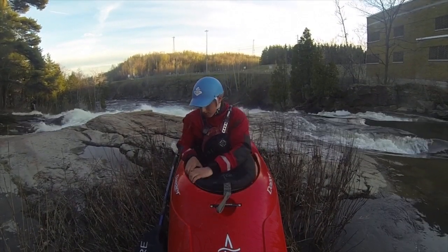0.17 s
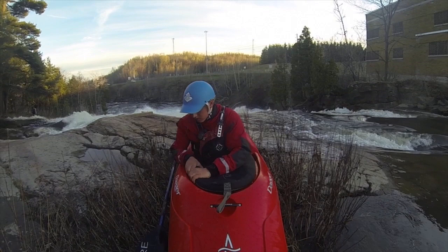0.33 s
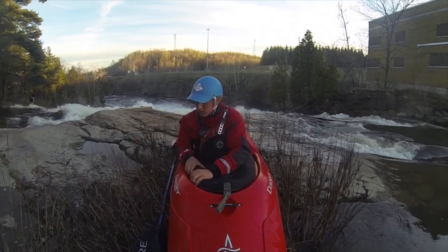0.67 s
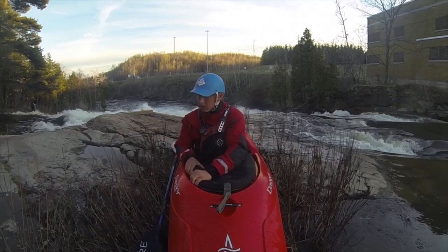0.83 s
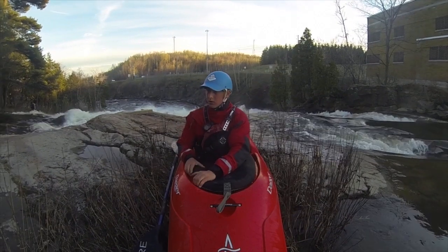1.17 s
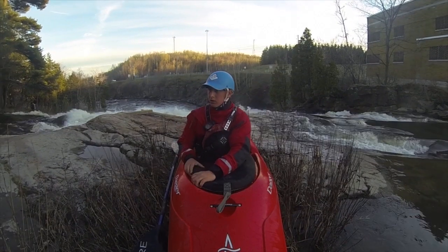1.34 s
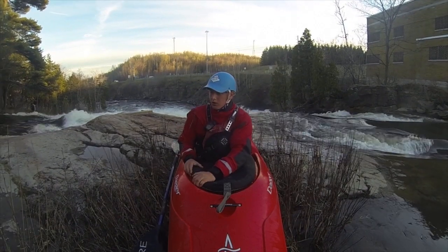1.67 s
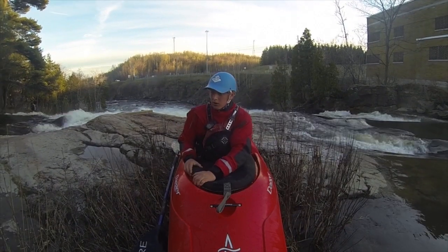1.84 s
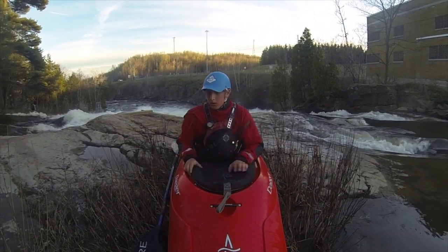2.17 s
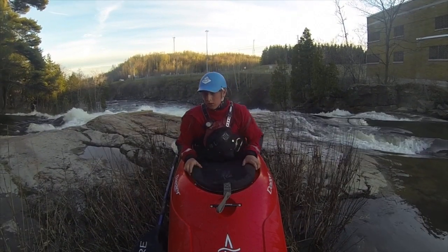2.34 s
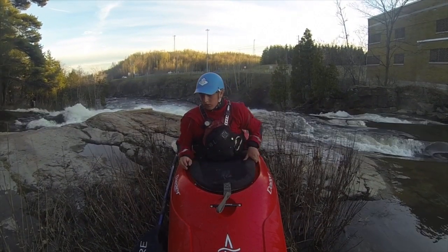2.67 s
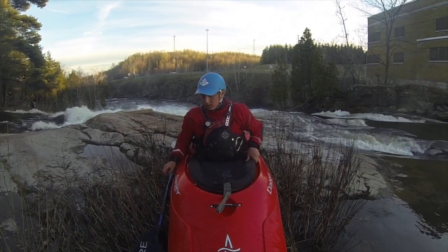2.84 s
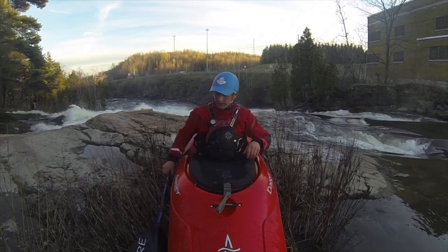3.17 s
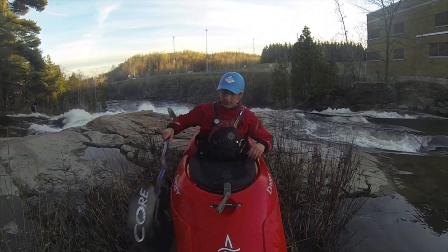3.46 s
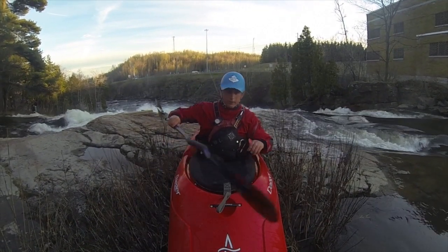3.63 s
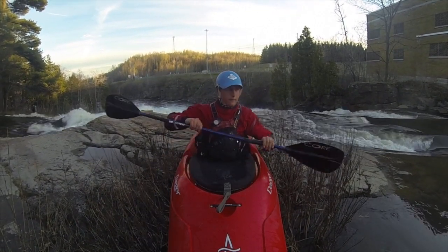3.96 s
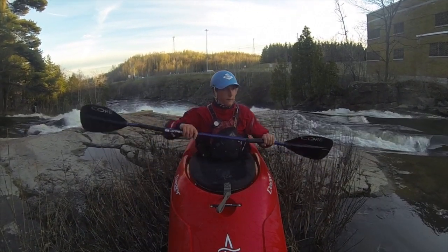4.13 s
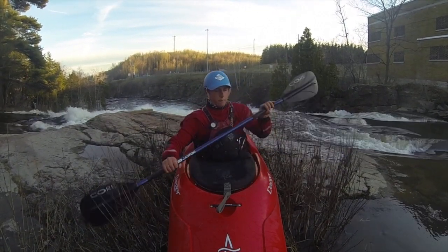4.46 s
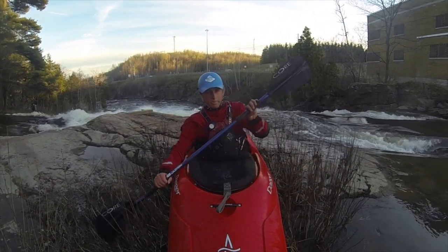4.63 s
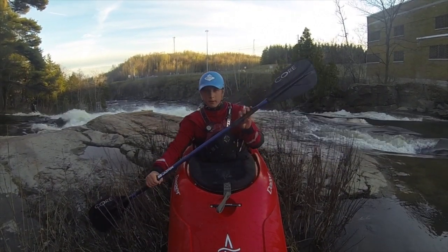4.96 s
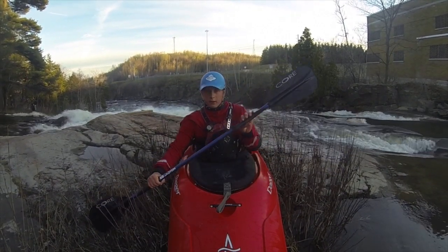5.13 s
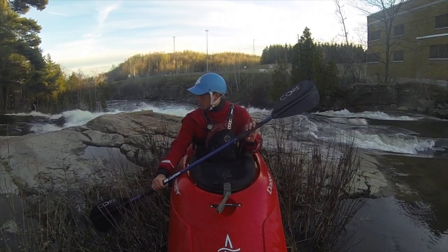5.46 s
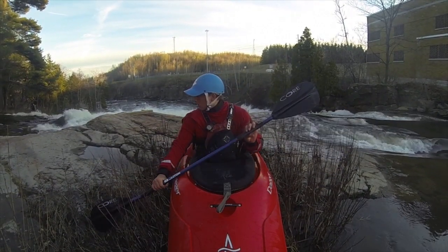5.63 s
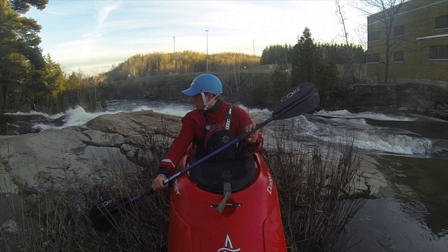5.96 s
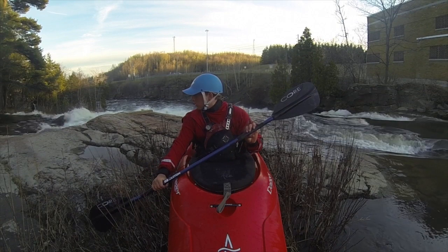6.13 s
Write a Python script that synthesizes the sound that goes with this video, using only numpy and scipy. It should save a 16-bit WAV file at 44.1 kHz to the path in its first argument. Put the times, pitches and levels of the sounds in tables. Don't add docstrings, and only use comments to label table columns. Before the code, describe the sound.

Boomy, close hull bumps and paddle clacks on a plastic boat, with dull white-water roar and a faint electronic whine behind.

```python
import sys
import numpy as np
from scipy import signal
from scipy.fft import rfft, irfft
from scipy.io import wavfile
from scipy.ndimage import uniform_filter1d

SR = 44100
rng = np.random.default_rng(int(sys.argv[2]) if len(sys.argv) > 2 else 0)


def dump(signal):
    limited = np.clip(np.atleast_2d(signal).T, -1, 1)
    pcm = np.round(limited * 32767).astype(np.int16)
    wavfile.write(sys.argv[1], SR, pcm)


def invert_db(x):
    u = np.asarray(x, float) / 20
    return 10 ** u


N = 277830

# frequency in Hz, level in dB per Hz.
SHELL_COLOUR = [(40, -29), (170, -10), (330, -22.5), (450, -37.5), (1100, -38), (1900, -34.5),
                (2400, -45.5), (3500, -51.5), (4600, -53.5), (5900, -57.5), (7000, -57.5), (8200, -64.5),
                (11500, -69.5), (16000, -81.5)]
# centre in Hz, width in Hz, level in dB per Hz.
SHELL_RESONANCES = [(254.2, 36, -7.5), (611, 120, -28), (696.5, 58, -25), (847, 28, -28.5), (951, 160, -34),
                    (1363, 180, -24), (1460.5, 195, -21.5), (1740, 120, -34), (2703, 87, -40),
                    (2948, 530, -39), (3484, 190, -47), (4130, 110, -53), (4990, 420, -50)]
# time in seconds,
# peak in dB.
TWIG_SNAPS = [(0.0012, -31), (.41, -61.5), (.49, -51.5), (1.0121, -49.5), (2.9292, -40.5), (3.032, -49),
              (3.9888, -55), (4.4194, -55), (4.62, -58), (4.642, -40.5), (4.667, -51), (4.6915, -51),
              (4.727, -47)]
# time in seconds, level in dB, T60 in seconds.
MOUNT_JOLTS = [
    (.1, -30, 1.5),
    (.28, -31, .7),
    (.52, -15, 2.6),
    (1.42, -26.5, 2.2),
    (2.0, -31, 2.7),
    (2.88, -38.5, 2.5),
    (4.28, -43, 1.0),
    (4.77, -36, 3.0),
    (5.72, -39, 3.0),
]
# start in seconds, length in seconds, level in dB.
SEAT_SHUFFLES = [(0.026, 0.33, -32.5), (0.31, 0.27, -24.5), (.55, 0.49, -32.5), (1.0, .06, -23),
                 (1.349, 0.13, -32), (1.92, 0.17, -33.5), (2.319, .15, -23.5), (2.456, 0.25, -27),
                 (2.65, 0.84, -37), (3.186, 0.23, -34.5), (4.1, 0.17, -33), (4.42, .16, -38),
                 (4.68, .3, -32), (5.538, 0.18, -39)]
# start in seconds, length in seconds, level in dB, pitch in Hz.
WEIGHT_SHIFTS = [(-.03, 0.052, -16, 131.6), (0.037, 0.19, -23, 116.7), (0.103, 0.26, -24, 118.7),
                 (0.397, 0.095, -20, 113.6), (0.469, 0.12, -12, 121), (0.632, 0.078, -23, 124.6),
                 (0.696, 0.14, -27, 129.3), (0.878, 0.12, -22.5, 118.8), (1.104, 0.19, -18.5, 121.7),
                 (1.369, 0.39, -30.5, 119.5), (1.699, .35, -28, 120.5), (2.089, 0.12, -26.5, 120),
                 (2.254, 0.063, -27.5, 119.4), (2.343, 0.29, -22, 118.6), (2.587, 0.093, -25.5, 118.6),
                 (2.908, .16, -20.5, 122.1), (3.053, 0.15, -25, 125.5), (3.219, 0.053, -10.5, 119.2),
                 (3.343, 0.11, -23, 116.1), (3.454, .33, -32, 118.4), (3.797, 0.29, -30.5, 120),
                 (4.114, 0.15, -24, 116), (4.262, .28, -31.5, 127.3), (4.529, 0.18, -25, 127.8),
                 (4.684, 0.13, -25, 124), (4.797, 0.19, -28, 118.1), (4.936, 0.13, -23.5, 121.6),
                 (5.257, 0.14, -26, 124), (5.466, 0.21, -33, 115.2), (5.994, 0.27, -32.5, 120.3)]
# start in seconds, length in seconds, level in dB, brightness in dB.
DECK_STROKES = [(0.166, 0.45, -36, -7.5), (0.396, 0.048, -24, -14), (.466, 0.041, -29.5, -3.5),
                (0.498, 0.045, -28.5, -15), (0.522, 0.17, -39, -8.5), (0.783, 0.089, -34, -12),
                (.89, .11, -41, -13), (2.19, 0.13, -45, -6), (2.303, 0.031, -30.5, -10.5),
                (2.329, .4, -46.5, -7.5), (2.931, 0.057, -29, -10), (3.021, 0.065, -34.5, -14),
                (3.121, 0.14, -32.5, -17), (3.254, 0.028, -30.5, -15), (3.284, 0.12, -46.5, -12),
                (4.148, 0.023, -30.5, -8), (4.16, 0.41, -42.5, -2.5), (4.524, .04, -31.5, -12),
                (4.56, 0.055, -41, -2), (4.594, 0.19, -29, -9), (4.83, 0.026, -34.5, -25),
                (4.874, 0.15, -40.5, -12)]
# time in seconds,
# peak in dB, depth in dB, hardness in dB.
HULL_KNOCKS = [(.403, -16.5, -10.5, -18.5), (.424, -20.5, -5, -15.5), (.469, -17, -18.5, -10),
               (.484, -10, -12, -15), (0.492, -11, -17.5, -12), (.788, -23.5, -21, -23),
               (.804, -20, -17, -16.5), (.897, -22.5, -18, -22), (.911, -23.5, -20, -13),
               (1.0128, -23.5, 8.5, -10), (1.019, -16.5, 0, -18), (1.0281, -11, -4, -16),
               (1.078, -28, -14, -16), (1.142, -32.5, 5.5, -29), (2.312, -35, 10.5, -15),
               (2.353, -28, -7, -23), (2.386, -35.5, 11, -21), (2.47, -38.5, 7.5, -16),
               (2.9312, -14, 1.5, -1.5), (2.9345, -11.5, 7, -9), (2.95, -13, -5, -33),
                 (3.032, -19, -5, -4.5), (3.037, -17, 7, -13), (3.059, -19, -12, -27),
                 (3.126, -23, -6, -30), (3.1674, -23.5, 4, -16), (3.18, -19, 0, -23), (3.191, -36, -9, -19),
                 (3.214, -19.5, 3.5, -13), (3.2712, -13, -9, -27), (4.151, -28, -1, -18),
                 (4.365, -35, -30, -23), (4.433, -29, 4.5, -13), (4.533, -28, -10, -16),
                 (4.63, -16, -18, -15), (4.728, -32, -7, -3), (4.838, -28, -14, -7), (4.899, -28, -16, -23),
                 (5.569, -20.5, 0, -3.5), (5.574, -25, 5.5, -6)]
# lower edge in Hz, upper edge in Hz.
KNOCK_BANDS = [
    (1150, 2200),
    (330, 1150),
    (2200, 3900),
    (3900, 6100),
]
# time in seconds, peak in dB, pitch in Hz, swell in seconds, T60 in seconds.
HULL_THUMPS = [(.062, 1.5, 111.7, 0.021, 0.097), (0.511, -3.5, 126.6, 0.014, 0.063),
               (.72, -12.5, 137.3, 0.022, 0.083), (1.012, -2.5, 254, 0.0018, 0.18),
               (1.016, 1, 130, 0.0042, 0.26), (1.014, -19.5, 704, 0.0061, 0.084),
               (1.035, -7, 123.4, 0.0094, 0.34), (1.1496, -2.5, 122.3, 0.004, 0.096),
               (2.944, -12, 129.2, 0.0099, 0.29), (3.217, -10, 122.5, 0.016, 0.26),
               (5.15, -24, 113.8, 0.036, 0.18), (5.566, -3.5, 87, 0.0056, 0.024),
               (5.571, -1, 120.7, 0.016, 0.055), (5.589, -8, 188, 0.0081, 0.023),
               (5.631, -17.5, 119.9, 0.016, 0.16)]
# time in seconds, depth in dB, recovery in seconds.
LIMITER_DUCKS = [
    (.075, -1.5, .15),
    (1.022, -6, .26),
]


def unit(x):
    return x / np.sqrt(np.mean(x ** 2) + 1e-20)


def band(x, low_hz, high_hz, order=2):
    return signal.sosfilt(signal.butter(order, [low_hz, high_hz], "band", fs=SR, output="sos"), x)


def drift(rate_hz):
    pole = np.exp(-2 * np.pi * rate_hz / SR)
    wander = signal.lfilter([1], [1, -2 * pole, pole * pole], rng.standard_normal(N + SR))
    return unit(wander[SR:])


def swell(start, length, lean, round_top):
    out = np.zeros(N)
    i = np.arange(max(int(start * SR) + 1, 0), min(int((start + length) * SR), N))
    progress = (i / SR - start) / length
    out[i] = np.abs(np.sin(np.pi * progress ** lean)) ** round_top
    return out


def shell(x, passes=1, size=16384):
    hz = np.maximum(np.arange(size // 2 + 1) * SR / size, 1)
    points = np.array(SHELL_COLOUR)
    power = invert_db(np.interp(np.log(hz), np.log(points[:, 0]), points[:, 1])) ** 2
    for centre_hz, width_hz, db in SHELL_RESONANCES:
        power = power + invert_db(db) ** 2 / (1 + (2 * (hz - centre_hz) / width_hz) ** 2) ** 2
    cepstrum = irfft(passes * np.log(power) / 2)
    cepstrum[1:size // 2] *= 2
    cepstrum[size // 2 + 1:] = 0
    response = irfft(np.exp(rfft(cepstrum)))[:size // 2]
    return signal.fftconvolve(x, response / np.sqrt(np.sum(response ** 2)))[:N]


def whine():
    t = np.arange(N) / SR
    turns = t * 47.952
    part = turns % 1
    gate = uniform_filter1d(1. * ((part > .365) & (part < .775)), size=30)
    jitter = .9 * rng.standard_normal(int(turns[-1]) + 1)
    phase = 2 * np.pi * 6449.5 * t + jitter[turns.astype(int)]
    tones = invert_db(-59) * np.sin(phase) + invert_db(-71) * np.sin(2 * phase)
    hiss = invert_db(-84.5) * rng.standard_normal(N)
    return np.sqrt(2) * gate * tones + hiss


def roar():
    white = rng.standard_normal(N)
    low = signal.sosfilt(signal.butter(1, 450, fs=SR, output="sos"), white)
    low_surge = invert_db(.8 * drift(3.0)) * low
    high_surge = invert_db(.6 * drift(6.0)) * (white - low)
    return invert_db(-33) * shell(low_surge + high_surge)


def twigs():
    clicks = np.zeros(N)
    rows = np.array(TWIG_SNAPS)
    clicks[np.round(rows[:, 0] * SR).astype(int)] = invert_db(rows[:, 1] + 10.0)
    return band(clicks + 1e-18, 4500, 14000, order=1)


def sway():
    t = np.arange(N) / SR
    mount_hz, rise_s, swing_rest_db, seat_rest_db = 14, .12, -48.5, -54.5
    swings = []
    for s, db, t60 in MOUNT_JOLTS:
        rise = np.clip(1 + (t - s) / rise_s, 0, 1) ** 2
        swings.append(invert_db(db - 60 * np.maximum(t - s, 0) / t60) * rise)
    swing = invert_db(swing_rest_db) + np.max(swings, axis=0)
    seat = invert_db(seat_rest_db)
    for s, length, db in SEAT_SHUFFLES:
        seat = seat + invert_db(db) * swell(s, length, lean=0.65, round_top=0.75)
    slow = np.sqrt(2) * np.sin(2 * np.pi * np.cumsum(mount_hz + .4 * drift(2.0)) / SR)
    lumps = unit(band(rng.standard_normal(N + SR), 26, 140)[SR:])
    return swing * slow + seat * lumps


def boom():
    power = invert_db(-39) ** 2
    for s, length, db, _ in WEIGHT_SHIFTS:
        power = power + (invert_db(db) * swell(s, length, lean=1.0, round_top=0.61)) ** 2
    start, length, _, hz = np.transpose(WEIGHT_SHIFTS)
    pitch = np.interp(np.arange(N) / SR, start + length / 2, hz)
    wander_hz, wander_db = 3.0 * drift(20.0), 2.6 * drift(14.0)
    phase = 2 * np.pi * np.cumsum(pitch + wander_hz) / SR
    return np.sqrt(2 * power) * invert_db(1.5 + wander_db) * np.sin(phase)


def rubbing():
    level, bright = np.zeros((2, N))
    for s, length, db, bright_db in DECK_STROKES:
        press = invert_db(db + 1.5) * swell(s, length, lean=0.9, round_top=0.57)
        level = level + press
        bright = bright + invert_db(bright_db) * press
    present = rng.random(N) < 5000 / SR
    size = invert_db(1.9 * np.minimum(rng.exponential(1, N), 5))
    grains = present * size * rng.choice([-1, 1], N)
    body = shell(grains * invert_db(3.06 * drift(44.0)))
    middle = band(body, 450, 2340)
    scale = np.sqrt(np.mean(middle ** 2))
    dull = middle + invert_db(-18) * band(body, 260, 600)
    return (level * dull + bright * band(body, 1500, 6100)) / scale


def knocks():
    contact_t60_s, bright_t60_s = .024, 0.092
    edge_below_db = -17.5
    length, rows = SR // 8, HULL_KNOCKS
    t = np.arange(length) / SR
    out, noise = np.zeros(N + SR), rng.standard_normal((len(rows), length))
    click = shell(np.r_[1., np.zeros(length)], passes=1.43)
    for (s, db, low_db, hard_db), burst in zip(rows, noise):
        contact = burst * (1 - np.exp(-t / 0.001)) * invert_db(-60 * t / contact_t60_s)
        hit = signal.fftconvolve(np.diff(contact, 2), click)[:length]
        parts = [band(hit, *edges, order=4) for edges in KNOCK_BANDS]
        middle, low, upper, edge = [p / np.abs(p).max() for p in parts]
        bright = invert_db(hard_db - 1.5 - 60 * t / bright_t60_s) * (upper + invert_db(edge_below_db) * edge)
        i = round((s - .002) * SR)
        out[i:i + length] += invert_db(db - 3.0) * (middle + invert_db(low_db) * low + bright)
    return out[:N]


def thumps():
    out, override = np.zeros((2, N + SR))
    t = np.arange(SR // 2) / SR
    for s, db, hz, swell_s, t60 in HULL_THUMPS:
        rise = np.sin(np.pi / 2 * np.minimum(t / swell_s, 1)) ** 2
        shape = rise * invert_db(-60 * np.maximum(t - swell_s, 0) / t60)
        i = round(s * SR)
        span = slice(i, i + len(t))
        out[span] += invert_db(db) * shape * np.sin(2 * np.pi * hz * t)
        override[span] = np.maximum(override[span], np.sqrt(shape))
    return out[:N], override[:N]


def scene():
    water, hum, mount, drag = roar(), boom(), sway(), rubbing()
    blows, override = thumps()
    standing = hum * (1 - override)
    return (water + standing + blows + mount + drag + knocks() + twigs())[None]


def roll_off(x):
    return signal.sosfilt(signal.butter(12, 15138, fs=SR, output="sos"), x)


def record(dry):
    t = np.arange(N) / SR
    duck_db = np.zeros(N)
    for s, db, recovery_s in LIMITER_DUCKS:
        duck_db += db * (t > s) * np.exp(-(np.maximum(t - s, 0) / recovery_s) ** 2)
    gain = invert_db(uniform_filter1d(duck_db, size=300))
    ducked = (dry + whine()) * gain
    rounded = 2.4 * np.tanh(ducked / 2.5)
    return roll_off(rounded)


dry = scene()
out = record(dry)
dump(out)
```